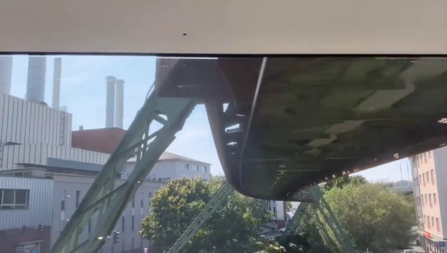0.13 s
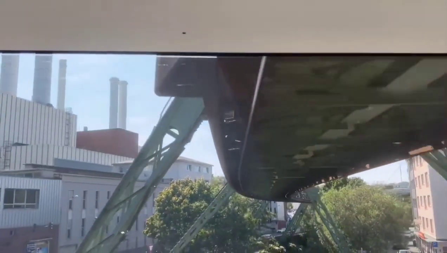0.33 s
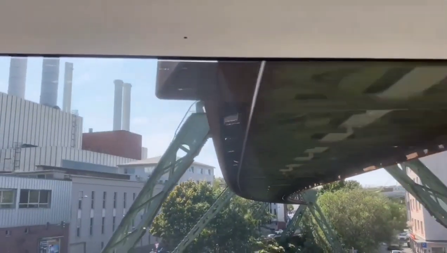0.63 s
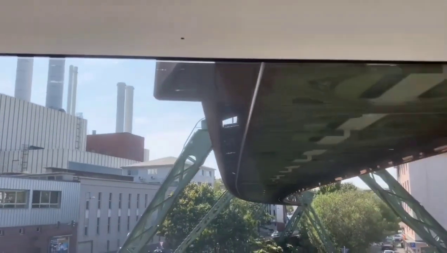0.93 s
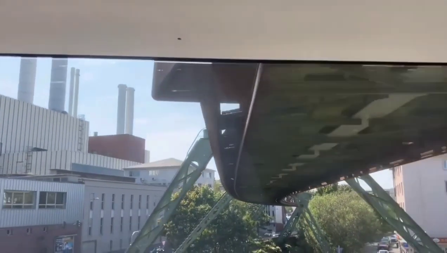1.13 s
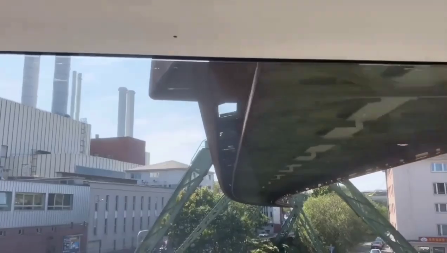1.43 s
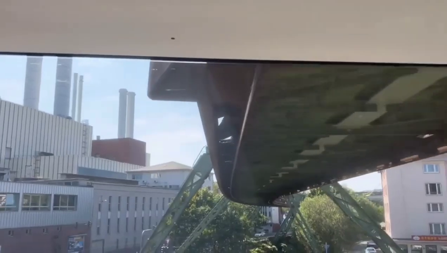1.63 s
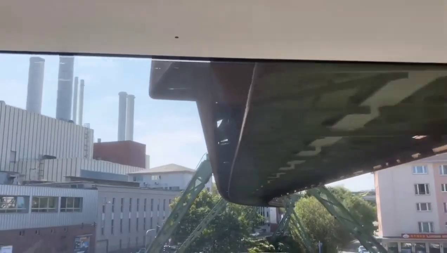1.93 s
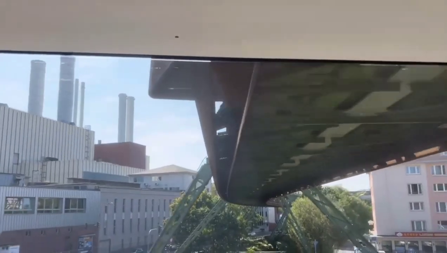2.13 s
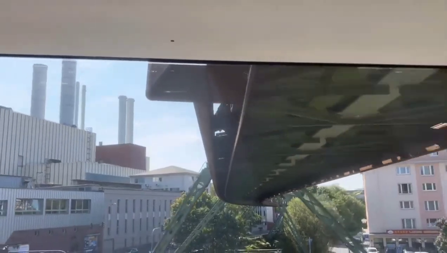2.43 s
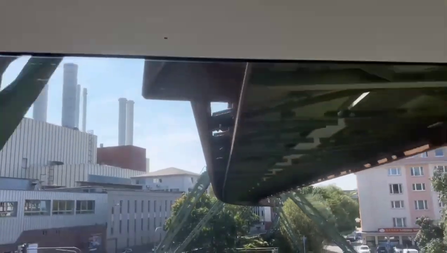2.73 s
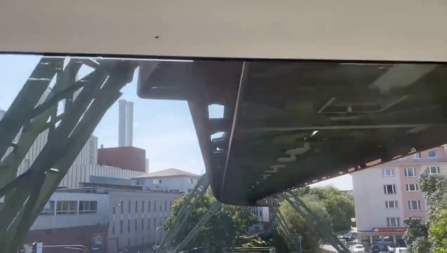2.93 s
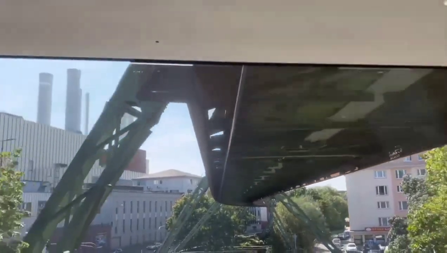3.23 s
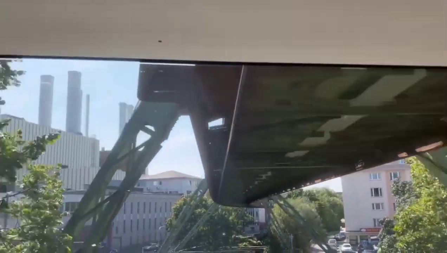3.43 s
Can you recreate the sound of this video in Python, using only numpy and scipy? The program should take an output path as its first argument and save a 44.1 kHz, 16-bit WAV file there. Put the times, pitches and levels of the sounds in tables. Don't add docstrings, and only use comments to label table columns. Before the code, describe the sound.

A suspended train rumbles throughout, heard inside the cabin by a phone near the window. Bass dominates, with humming panels, soft body thuds, steady rushing air and a faint, wavering high whine. Low booms swell near 0.6, 1.2 and 1.7 s, strongest around 2.3 s, when hard rail-joint knocks, short groans and dry trim rattles cluster until 2.55 s. Calmer rumbling follows, with a dull knock at 3.1 s, continuing to the cut-off at 3.6 s.

```python
import sys
import numpy as np
from scipy import signal
from scipy.fft import rfft, irfft, next_fast_len
from scipy.io import wavfile
from scipy.ndimage import uniform_filter1d

SR = 44100
rng = np.random.default_rng(int(sys.argv[2]) if len(sys.argv) > 2 else 0)


def elevation(decibels):
    levels = np.asarray(decibels, float)
    return 10 ** (levels / 20)


def int16_out(signal):
    q = np.round(np.clip(np.atleast_2d(signal).T, -1, 1) * 32767)
    wavfile.write(sys.argv[1], SR, q.astype(np.int16))


N = 158319
LONG = next_fast_len(N, True)
TIME = np.arange(N) / SR

# time in seconds, pitch in Hz, level in dB.
BOOM_CURVE = [(0, 60.5, -28.5), (.24, 60, -31.5), (.53, 66.07, -26), (.63, 66.7, -17), (.85, 68.42, -34.5),
              (1.08, 67.07, -25.5), (1.17, 66.02, -13), (1.25, 67.7, -30), (1.6, 66.04, -22.5),
              (1.68, 65.1, -11), (1.84, 63.27, -21), (1.9, 59.74, -33), (2.1, 64.4, -32),
              (2.13, 64.13, -17), (2.27, 63.87, -6.5), (2.5, 63.7, -13), (2.63, 65.08, -24.5),
              (3.59, 66.65, -33.5)]

# time in seconds, pitch in Hz, level in dB.
WHINE_CURVE = [(0, 2792, -49), (.3, 2788, -50), (.5, 2781, -54), (.85, 2787, -49), (1, 2780, -55),
               (1.3, 2776, -56), (1.5, 2786, -48), (1.69, 2786, -46), (1.76, 2775, -58), (1.98, 2775, -48),
               (2.08, 2780, -62), (2.44, 2765, -63), (2.56, 2794, -48), (2.84, 2797, -48),
               (3.02, 2778, -54), (3.15, 2768, -49), (3.3, 2758, -50), (3.59, 2795, -50)]


def evened(x):
    return x / np.sqrt(np.mean(x ** 2, -1, keepdims=True) + 1e-20)


def pair_gain(mid_db, side_db):
    return elevation(np.array([[mid_db], [side_db]]))


def read(points, hz):
    f, value = np.transpose(points)
    octave = np.log2(hz + 1)
    below = np.maximum(np.log2(f[0] + 1) - octave, 0)
    above = np.maximum(octave - np.log2(f[-1] + 1), 0)
    return np.interp(octave, np.log2(f + 1), value) - 24 * (below + above)


def track(table, order):
    return np.interp(TIME, *np.transpose(table)[[0, order]])


def colour(x, points):
    gain = elevation(read(points, np.fft.rfftfreq(LONG, 1 / SR)))
    return evened(irfft(rfft(x, LONG) * gain, LONG)[..., :N])


def noise(points):
    return colour(rng.standard_normal(N), points)


def waver(span_s):
    span = int(span_s * SR)
    return evened(uniform_filter1d(uniform_filter1d(rng.standard_normal(N), span), span))


def hum(hz, width):
    step = 16
    count = N // step + 2
    slow = rng.standard_normal((2, count)) + 1j * rng.standard_normal((2, count))
    r = np.exp(-np.pi * width * step / SR)
    slow = signal.lfilter([1], np.convolve([1, -r], [1, -r]), slow)
    slow = np.array([np.interp(np.arange(N) / step, np.arange(count), row) for row in slow])
    carrier = np.exp(2j * np.pi * np.cumsum(hz * np.ones(N)) / SR)
    return evened((slow * carrier).real)


def tone(curve, fuzz_db, width, side_db):
    hz = track(curve, order=1)
    turns = np.cumsum(hz) / SR
    note = np.sqrt(2) * np.sin(2 * np.pi * turns + np.array([[0], [1.]]))
    fuzzy = evened(note + elevation(fuzz_db) * hum(hz, width))
    return elevation(track(curve, order=2)) * pair_gain(0, side_db) * fuzzy


def patchy(x, depth_db):
    z = signal.stft(x, nperseg=512)[2]
    patches = uniform_filter1d(rng.standard_normal(z.shape[1:]), size=2, axis=0)
    patches = uniform_filter1d(patches, size=7, axis=1)
    return signal.istft(z * elevation(depth_db * patches / patches.std()), nperseg=512)[1][:, :N]


def ports(x):
    # frequency in Hz, phase in radians.
    lag = [(6900, -.1), (7550, .15), (8950, 2.3), (9100, 3.05), (10350, 3.25), (12200, 5.9), (13900, 6.5),
           (14600, 8.4)]
    half = np.interp(np.fft.rfftfreq(LONG, 1 / SR), *np.transpose(lag)) / 2
    return irfft(rfft(x, LONG) * np.array([np.cos(half), 1j * np.sin(half)]), LONG)[:, :N]


def rush():
    # frequency in Hz, level in dB per Hz.
    air_mid = [(1000, -4), (1600, -2), (2300, -11), (3200, -4.5), (4200, -12.5), (5000, -11.5),
               (6300, -18.5), (8600, -25)]
    # frequency in Hz, level in dB per Hz.
    air_side = [(1750, -11.5), (2500, -2), (3200, -3.5), (4200, -10.5), (5600, -9.5), (6700, -10.5),
                (7000, -37.5)]
    # frequency in Hz, level in dB per Hz.
    hiss_spectrum = [(5500, -6.5), (7000, -1.5), (8500, -4.5), (10000, -3), (11500, -5), (12500, -6),
                     (13700, -13.5), (15000, -16.5)]
    hiss_db, hiss_loose_db = -56.5, -13.5
    skirt_db, skirt_side_db, skirt_width_hz = -53.5, -15, 191
    patch_db, waver_db = 2, -0.17

    air = np.array([noise(air_mid), noise(air_side)]) * pair_gain(-49.5, -55)
    hiss = ports(noise(hiss_spectrum))
    hiss[1] += elevation(hiss_loose_db) * noise(hiss_spectrum[1:4])
    skirt = hum(track(WHINE_CURVE, order=1), skirt_width_hz)
    skirt = skirt * pair_gain(skirt_db, skirt_db + skirt_side_db)
    flutter = elevation(waver_db * (waver(0.005) + waver(0.063)))
    return patchy(air + elevation(hiss_db) * hiss + skirt, patch_db) * flutter


def rolling():
    # frequency in Hz, level in dB per Hz.
    rumble_mid = [(20, -6.5), (45, -0.5), (85, -1.5), (190, -15.5), (350, -20.5), (500, -28), (900, -35),
                  (1700, -45.5)]
    # frequency in Hz, level in dB per Hz.
    rumble_side = [(12, -39), (20, -23), (92, -3), (148, -13), (329, -15.5), (430, -18), (1160, -27.5),
                   (1460, -24), (1900, -38), (2470, -69.5), (4180, -120)]
    # pitch in Hz, width in Hz, centre level in dB, difference level in dB,
    # share of the shaking that it follows (0 to 1).
    panels = [(106.14, 24.3, -30.5, -36.5, 0.7), (164.5, 14, -35.5, -54, 0.17),
              (320, 100, -43.5, -44.5, 0.21), (633.4, 142, -47.5, -51.5, .05), (781, 12, -57.5, -48.5, .05),
              (1053, 80, -58, -60, .05), (1463, 33, -59, -56, .05), (1657, 33, -58.5, -65.5, 0.055),
              (1860, 50, -63, -84, .05), (2133, 18, -75, -83, .05)]
    follows, waver_db = 0.17, 1.69

    shake_db = track(BOOM_CURVE, order=2) + 22
    rumble = np.array([noise(rumble_mid), noise(rumble_side)]) * pair_gain(-22.5, -36.5)
    out = rumble * elevation(follows * shake_db + waver_db * waver(0.053))
    for hz, width, mid_db, side_db, share in panels:
        out += hum(hz, width) * pair_gain(mid_db, side_db) * elevation(share * shake_db)
    return out


def whine():
    return tone(WHINE_CURVE, fuzz_db=-7, width=16, side_db=-15)


def rattles():
    # start in seconds, length in seconds, level in dB, ring pitch in Hz.
    bursts = [
        (1.588, 0.096, -46, 2096),
        (1.651, 0.098, -47.5, 1497),
        (1.739, 0.044, -37.5, 2070),
        (1.787, 0.046, -47.5, 2400),
        (1.986, 0.15, -50, 2388),
        (2.21, 0.11, -47, 920),
        (2.356, 0.064, -40.5, 1503),
        (2.428, 0.057, -40.5, 5030),
        (2.481, 0.034, -49.5, 1700),
        (.0, 0.13, -53, 812),
    ]
    # frequency in Hz, level in dB per Hz.
    tick_spectrum = [(500, -20), (900, 6), (2200, 1.5), (3500, -7), (5000, -6.5), (7000, -16.5),
                     (12000, -16), (15000, -28)]
    ticks_per_s, side_db = 1600, -3.5
    ring_db, ring_width_hz = -15, 550

    strong = rng.random((2, N)) < ticks_per_s / SR
    ticks = rng.standard_normal((2, N)) * (0.59 + strong * 0.52)
    swell = np.zeros(N)
    for s, length, db, hz in bursts:
        rise = np.clip((TIME - s) / .004, 0, 1)
        fall = np.clip((s + length - TIME) / (0.43 * length), 0, 1)
        swell += elevation(db) * rise * fall
    starts, ring_hz = np.transpose(sorted((s, hz) for s, length, db, hz in bursts))
    latest = np.searchsorted(starts, TIME, "right") - 1
    ring = hum(ring_hz[latest], ring_width_hz) * pair_gain(ring_db, ring_db + side_db)
    aside = np.array([np.zeros(N), colour(ticks[1], tick_spectrum[:5])]) * elevation(side_db)
    return swell * (ports(colour(ticks[0], tick_spectrum)) + aside + ring)


def groans():
    # start in seconds,
    # length in seconds, pitch in Hz, level in dB.
    groans_and_rings = [(0.15, 0.184, 647, -42), (1.066, 0.1334, 644, -41), (1.227, 0.1716, 631, -43),
                        (1.653, 0.099, 640.3, -40.5), (2.779, 0.046, 386, -40), (0, 0.064, 308.3, -35),
                        (0.396, 0.055, 339.6, -31.5), (0.568, 0.054, 317.6, -28.5), (0.626, 0.046, 300, -40),
                        (0.699, .05, 327.5, -25.5), (0.745, 0.021, 320, -27), (0.883, .06, 336.5, -38),
                        (1.058, 0.0683, 361, -35), (1.373, 0.066, 300, -36.5), (1.577, 0.072, 416, -37.5),
                        (2.182, 0.041, 313, -23.5), (2.206, 0.028, 381, -30.5), (2.262, 0.021, 330, -25),
                        (2.265, 0.025, 652, -37), (2.3, 0.035, 320, -24.5), (2.337, .035, 222, -21),
                        (2.353, 0.029, 843, -33.5), (2.365, 0.028, 480, -29), (2.39, .035, 340.5, -30.5),
                        (2.397, .05, 174.4, -25.5), (2.441, 0.068, 348.6, -32.5), (2.45, 0.073, 168, -25.5),
                        (2.503, 0.025, 614, -41), (2.55, 0.015, 527, -38), (2.69, 0.09, 169.5, -32),
                        (3.06, 0.065, 300, -34.5), (3.293, 0.074, 335, -33), (3.412, 0.064, 352.4, -36),
                        (3.488, 0.094, 360, -35.5), (2.428, 0.024, 5070, -48), (2.445, .025, 4930, -53),
                        (2.358, 0.014, 4970, -54)]
    # start in seconds, length in seconds, pitch in Hz, level in dB.
    body_thuds = [(0, 0.049, 81, -20.5), (0.271, 0.18, 65.8, -23), (0.361, 0.085, 115.4, -27),
                  (0.469, 0.074, 78.5, -26), (0.679, 0.13, 92.7, -19), (1.011, 0.1, 73, -19),
                  (1.2, 0.13, 107.5, -24), (1.33, 0.14, 71.26, -21.5), (1.518, 0.078, 72.5, -15.5),
                  (1.581, 0.093, 79.2, -18), (1.5, 0.19, 118, -25), (1.812, .07, 75, -18.5),
                  (2.011, 0.073, 63, -15), (2.208, 0.068, 115.6, -20.5), (2.63, 0.116, 78.7, -14.5),
                  (2.8, 0.12, 66, -18.5), (3.088, 0.083, 63, -17), (3.169, 0.063, 78, -16),
                  (3.259, 0.12, 90.4, -22), (3.36, 0.056, 68.5, -15.5), (3.474, 0.065, 82, -22.5)]
    side_gain, wobble, wide_hz = .4, 0.024, 300

    notes = [*groans_and_rings, *body_thuds]
    out = np.zeros((2, N + SR))
    for (s, length, hz, db), (aside, beat) in zip(notes, rng.random((len(notes), 2))):
        t = np.arange(0, length, 1 / SR)
        pitch = hz * (1 + wobble * np.sin(2 * np.pi * (t / length + beat)))
        turns = np.cumsum(pitch) / SR + np.array([[0], [aside]])
        swell = elevation(db) * np.sqrt(2) * np.sin(np.pi * t / length)
        width = np.array([[1], [side_gain * min(hz / wide_hz, 1)]])
        at = max(int(s * SR), 0)
        out[:, at:at + len(t)] += swell * np.sin(2 * np.pi * turns) * width
    return out[:, :N]


def knocks():
    # start in seconds, strength in dB, own ring pitch in Hz, own ring level in dB,
    # own ring time to fall 60 dB in seconds.
    joints = [
        (.578, -18, 163, 10.5, 0.16),
        (0.721, -23, 102, 14, 0.32),
        (1.63, -22.5, 99, 14, .3),
        (2.243, -8.5, 307, -3, .08),
        (2.331, -16.5, 112, 9, .3),
        (2.37, -8.5, 290, -1.5, .12),
        (2.448, -22.5, 107, 8, 0.47),
        (2.474, -18.5, 107.5, 13.5, 0.27),
        (2.547, -20.5, 323, 0, .1),
        (3.081, -21, 163.8, 7, 0.25),
    ]
    # pitch in Hz, level in dB, time to fall 60 dB in seconds.
    frame = [(102.3, -4.5, 0.23), (205.5, 0.5, 0.086), (278, -9, 0.11), (331, -8.5, 0.057),
             (470.4, -11.5, 0.081), (522, -15, 0.13), (695, -15, 0.058), (874, -23, .07),
             (1056, -14.5, 0.053)]
    rise_s, knock_db, side_db = 0.0058, -3, -14

    out = np.zeros((2, N + SR))
    t = np.arange(SR // 2) / SR
    for s, db, *own in joints:
        ring = np.zeros((2, len(t)))
        for f, d, t60 in [*frame, own]:
            chance = rng.random(2)
            pitch = f * (.96 + 0.1 * chance[0])
            phase = chance[:, None] * np.array([[.15], [1]])
            ring += elevation(d - 60 * t / t60) * np.sin(2 * np.pi * (pitch * t + phase))
        at = int(s * SR)
        out[:, at:at + len(t)] += elevation(db + knock_db) * np.minimum(t / rise_s, 1) * ring
    return out[:, :N] * pair_gain(0, side_db)


def boom():
    return tone(BOOM_CURVE, fuzz_db=-14, width=11, side_db=-35.5)


def scene():
    mid, side = rush() + rolling() + whine() + rattles() + groans() + knocks() + boom()
    left_db = 1.07
    return np.array([mid + side, mid - side]) * pair_gain(left_db / 2, -left_db / 2)


def top_cut(x):
    return signal.sosfilt(signal.butter(12, 15100, fs=SR, output="sos"), x)


def record(dry):
    # time in seconds, change of level in dB.
    dips = [(0.026, 2), (0.609, -4.5), (0.654, -9.5), (1.054, -6.5), (1.098, -5.5), (1.145, -6.5),
            (1.191, -4), (1.24, -4), (1.262, -7), (1.375, -5), (1.424, -4.5), (1.564, -8), (1.728, -1),
            (1.864, -5), (2.026, -7), (2.165, -8.5), (2.188, -8), (2.261, -2.5), (2.283, -6), (2.33, -4.5),
            (2.353, -5.5), (2.49, -2), (2.517, -6), (2.54, -3), (.632, -6), (2.656, -9), (3.141, -6),
            (3.189, -4), (3.211, -5.5), (3.379, -4.9), (3.396, -5), (3.582, 1.5)]
    dip_s, dip_deeper, treble_hz = 0.0032, 1.67, 1700
    limit, knee = 1.05, 4

    hz = np.fft.rfftfreq(LONG, 1 / SR)
    treble = irfft(rfft(dry, LONG) / (1 + (treble_hz / (hz + 1)) ** 4), LONG)[:, :N]
    dip_db = sum(dip_deeper * db * np.exp(-.5 * ((TIME - s) / dip_s) ** 2) for s, db in dips)
    ducked = dry - treble * (1 - elevation(dip_db))
    rounded = ducked / (1 + abs(ducked / limit) ** knee) ** (1 / knee)
    return top_cut(rounded)


dry = scene()
out = record(dry)
int16_out(out)
```